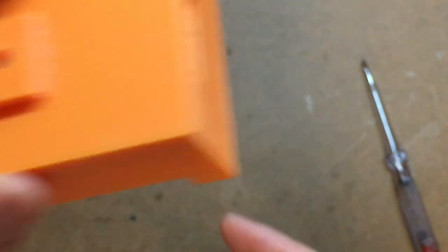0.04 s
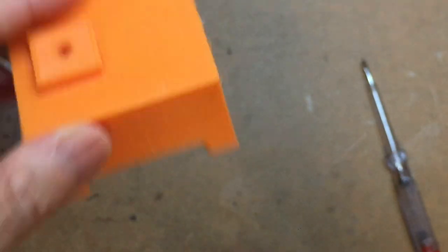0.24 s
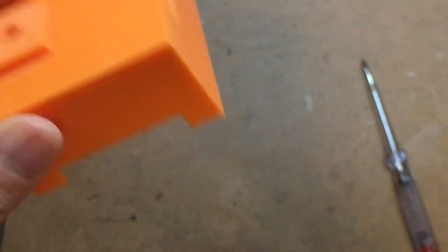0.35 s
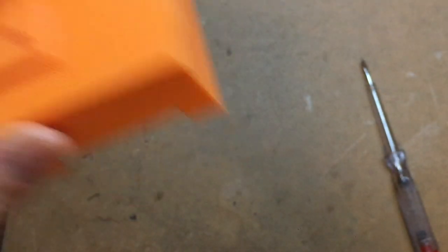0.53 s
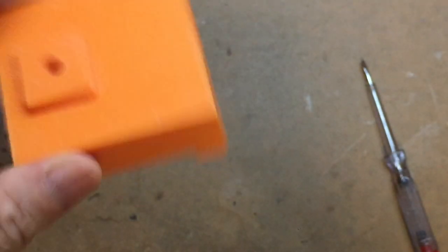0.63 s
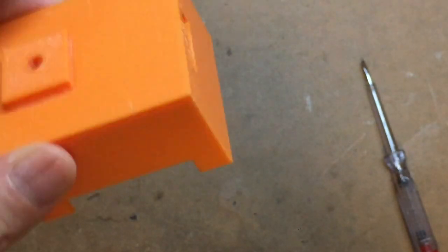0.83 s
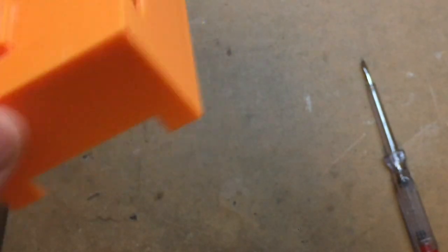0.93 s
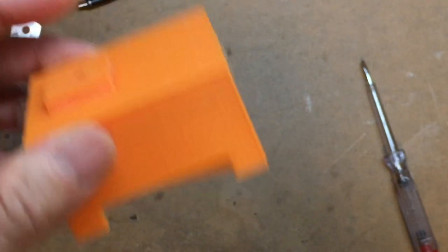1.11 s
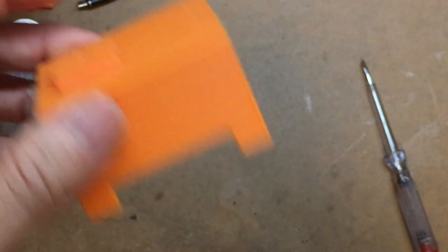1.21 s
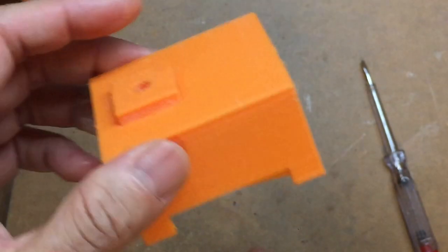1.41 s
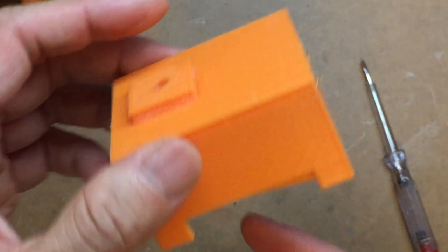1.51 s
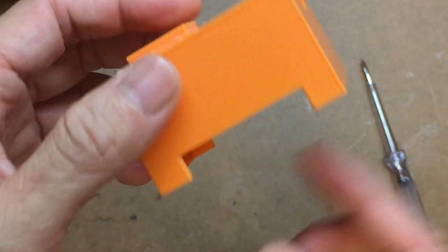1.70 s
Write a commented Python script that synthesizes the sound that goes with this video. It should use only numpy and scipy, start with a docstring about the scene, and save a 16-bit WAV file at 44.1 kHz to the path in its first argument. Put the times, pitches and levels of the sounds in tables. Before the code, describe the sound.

A loose part rattles inside a hollow plastic housing shaken by hand. Sharp clacks alternate with duller, chattering knocks, then the part bounces softly to rest, heard close up in a small room.

```python
"""A small room, over a workbench: a hollow plastic housing is shaken by hand. A loose part inside clacks hard
against one stop, falls back with a duller, chattering knock and bounces to rest. Each blow rings the shell
briefly, and the room answers with a short tail. Underneath sit a faint slide of the fingers, soft bumps of the
grip, a low rumble, hum and hiss."""
import sys
import numpy as np
from scipy import signal
from scipy.fft import rfft, irfft
from scipy.io import wavfile
from scipy.ndimage import uniform_filter1d

SR = 44100
rng = np.random.default_rng(int(sys.argv[2]) if len(sys.argv) > 2 else 0)


def pcm_store(signal):
    """Save signal as 16-bit PCM."""
    levels = np.round(np.clip(np.atleast_2d(signal), -1, 1) * 32767)
    wavfile.write(sys.argv[1], SR, levels.astype(np.int16).T)


N = 77175

# Hard hits on the stop; the rebound's delay and gain are relative to its hit:
# start_s, level_db, weight_db, edge_db_per_octave, pitch_ratio, rebound_delay_s, rebound_gain_db
CLACKS = [(.2068, -23, -3, -1.5, 1.02, 0.0036, -3.5), (.4488, -22.5, 0, -1.5, 1.05, 0.0023, -5),
          (.6032, -17.5, 7, 3, 1.0, .0029, -7), (.7859, -18, 3.5, 1.5, .995, 0.0014, -20.5),
          (.9842, -21, -7.5, -2.5, 0.98, 0.0038, -10)]
# Softer falls and bounces, same columns as CLACKS
KNOCKS = [(.0078, -36.5, 4, 4.5, .98, 0.0027, -4), (.153, -54.5, -4, -5, .95, .002, -17),
          (.249, -36, -25, 0, 1.15, 0.0021, -3.5), (.2750, -21, 1, 3, 0.99, .0064, -1),
          (.302, -37, -1.5, -5, 0.81, 0.003, -3), (.3325, -29, -12.5, -5, .97, .0022, -8.5),
          (.370, -62, 7, 5, 0.72, 0.0036, 12), (.396, -57, -3, -3, 1.1, 0.0056, -7.5),
          (.4937, -22, 2, 3, .98, .004, -3), (.530, -34, -0.5, -1.5, 1.01, .004, 0.5),
          (.562, -31.5, -6.5, -1.5, 0.93, .002, -12), (.6698, -24, 6, 3.5, 0.971, 0.0034, -3.5),
          (.699, -32.5, 2.5, 0.5, 1.09, .003, -2.5), (.747, -40, -2, -0.5, .98, .002, -12.5),
          (.8515, -33.5, 1, 2.5, 0.96, .0021, 8), (.8873, -28, -0.5, 3, 0.95, 0.0018, -27),
          (.916, -45, 0, -5.5, 1.14, 0.0028, -9), (.941, -53, 0, -5, .98, .002, 3),
          (1.016, -41, -19, 1, 1.0, .002, 5.5), (1.0487, -23.5, 1.5, 1, 0.95, 0.006, 0),
          (1.098, -39, -1.5, -0.5, 1.07, 0.0052, -6), (1.131, -42, -4.5, -2, 0.97, .002, -6),
          (1.3075, -36.5, -7.5, -3, 1.034, 0.0037, 1), (1.3465, -40.5, -10.5, -8, 0.97, 0.0027, 5),
          (1.381, -57.5, -5.5, -6, 0.94, 0.0021, -3.5), (1.413, -47.5, -5, -6, .99, 0.0021, -4)]
# Tone of a hard, bright contact: frequency_hz, gain_db
HARD_CONTACT = [(150, -7), (450, -20.5), (800, -4.5), (1600, -2), (2400, 0.5), (3000, 4), (3400, 3.5),
                (4000, 5.5), (8000, 0.5), (15000, -1.5)]
# Tone of a soft, dull contact: frequency_hz, gain_db
SOFT_CONTACT = [(250, -19.5), (550, -20.5), (790, -6), (1100, -4.5), (1450, 1), (1900, 7), (2500, -9),
                (3300, -8), (4200, -17), (5500, -22), (9000, -21), (15000, -20)]
# Clear ringing modes of the shell: pitch_hz, gain_db, t60_s
SHELL_MODES = [(822, -14.5, 0.032), (1050, -13, 0.032), (1451, -2.5, 0.043), (1782, -6, 0.023),
               (1878, -6.5, 0.052), (2056.4, 3.5, .04), (2373, 0.5, 0.053), (2746, -4, 0.04),
               (3944, 6, 0.021), (4280, 5, .023), (4472, 2.5, 0.016), (5100, 1.5, .02), (5440, 4.5, 0.017),
               (6790, 4.5, 0.011), (8110, 0, 0.012), (9220, -7, .012)]
# Tone of the crack, a crowd of heavily damped modes between the clear ones: frequency_hz, gain_db
CRACK_TONE = [(200, -14), (500, -16), (800, -8), (2000, 1), (2900, 4.5), (3400, -9), (4000, 2), (5500, 3.5),
              (6200, 0), (7300, 3), (11000, -4.5), (16000, -11)]
# Length of the room's tail: frequency_hz, t60_s
ROOM_DECAY = [(300, 0.5), (1000, 0.28), (1950, 0.2666), (3000, 0.2435), (5000, 0.31), (9000, .25),
              (15000, 0.27)]
# Colour of the room's tail: frequency_hz, gain_db
ROOM_TONE = [(300, -2), (1000, 1), (1950, 1.5), (2800, 4.5), (3400, 3), (4200, 0), (5500, -0.5), (9000, 0),
             (15000, 1)]
# Bumps of the fingers on the housing: start_s, pitch_hz, level_db
GRIP_BUMPS = [(.272, 246, -58), (0.484, 290, -59.5), (.603, 316, -60.5), (1.214, 300.3, -65),
              (1.53, 408.2, -62.5)]
# Tone of the finger slide: frequency_hz, gain_db
SLIDE_TONE = [(500, -42), (1500, 9), (2300, -4.5), (3100, 0), (4500, -10), (14000, -33)]
# Tone of the rumble and hiss bed: frequency_hz, gain_db
BED_TONE = [(20, -45.5), (32, -26), (48, -6), (65, 1), (85, -4), (102, 0.5), (130, -8), (165, -4),
            (210, -23), (300, -20.5), (480, -29.5), (1000, -28.5), (2000, -37), (4500, -42.5), (14000, -51),
            (16000, -57)]
# Wavering low tones: pitch_hz, level_db
HUM_TONES = [(62, -58.5), (160, -69.5)]
# Contour that the bass partly follows, taken around its mean: time_s, contour_db
BASS_SWELL = [(0.02, -46.5), (0.086, -55), (0.114, -55.5), (0.772, -55.5), (0.814, -65.5), (0.876, -52.5),
              (0.914, -62.5), (1.032, -54.5), (1.274, -55), (1.308, -65.5), (1.33, -51.5), (1.464, -64),
              (1.492, -52.5), (1.652, -50), (1.682, -61.5), (1.72, -52.5)]


def rattle(hits, contact_tone, level_window_s=.005):
    """The loose part strikes the shell, then once more as it rebounds; the room answers both."""
    out = np.zeros(N)
    for start_s, level_db, weight_db, edge_db, pitch_ratio, rebound_s, rebound_db in hits:
        push = contact(contact_tone, weight_db, edge_db)
        blow = np.zeros(SR // 10)
        for delay_s, gain_db in ((0, 0), (rebound_s, rebound_db)):
            hit = signal.fftconvolve(shell(pitch_ratio), push)
            hit *= np.sqrt(level_window_s * SR / np.sum(hit ** 2))  # energy of one window at rms 1
            add(blow, delay_s, amp(level_db + gain_db) * hit)
        add(out, start_s, blow)
        add(out, start_s + .0054, room(blow))  # pre-delay
    return out


def contact(tone, weight_db, edge_db_per_octave, size=1024):
    """The short push of one contact: weight shelves the lows, edge tilts the highs."""
    hz = abs(np.fft.fftfreq(size, 1 / SR))
    low_shelf = 1 / (1 + (hz / 1320) ** 8)
    edge_octaves = np.log2(np.clip(hz, 1200, 6000) / 1200)
    log_gain = np.log(amp(curve(tone, hz) + weight_db * low_shelf + edge_db_per_octave * edge_octaves))
    spectrum = np.exp(np.conj(signal.hilbert(log_gain)))  # minimum phase keeps the attack up front
    return np.fft.ifft(spectrum).real[:size // 2]


def shell(pitch_ratio, strike_spread_db=2.5, grip_detune=.008, size=4096):
    """The housing rings in clear modes over a dense, dry crack; each blow lands a little differently."""
    t = np.arange(size) / SR
    ring = np.zeros(size)
    for k, (hz, gain_db, t60_s) in enumerate(SHELL_MODES):
        strike, grip = rng.standard_normal(2)
        mode = np.sin(2 * np.pi * hz * pitch_ratio * (1 + grip_detune * grip) * t)
        ring += (-1) ** k * amp(gain_db + strike_spread_db * strike) * fade(t, t60_s) * mode
    crowd = noise(CRACK_TONE, size)
    body = lowpass(crowd, cutoff_hz=6000, order=2)
    crack = body * fade(t, t60_s=.036) + (crowd - body) * fade(t, t60_s=.018)
    return unit(ring) + amp(1) * unit(crack)


def room(blow, send_db=-12, build_s=.0028, blur_hz=70, size=20000):
    """A diffuse tail in the colour of the blow: it builds quickly, and each band dies at its own speed."""
    # The room hears every side of the shell at once, which evens out its colour.
    bin_hz = np.fft.rfftfreq(size, 1 / SR)
    blur = np.exp(-((bin_hz[:801] - bin_hz[400]) / (blur_hz / 2)) ** 2)
    power = abs(rfft(blow, size)) ** 2
    colour = np.sqrt(abs(signal.fftconvolve(power, blur / blur.sum(), "same")))
    wash = irfft(rfft(noise(ROOM_TONE, size)) * colour, size)
    hz, t, bands = signal.stft(wash, SR, nperseg=256)
    envelope = fade(t, curve(ROOM_DECAY, hz)[:, None]) * (1 - np.exp(-t / build_s))
    tail = signal.istft(bands * envelope, SR, nperseg=256)[1]
    return amp(send_db) * tail / np.sqrt(size * np.mean(envelope ** 2))


def fingers(rise_s=.0096, size=6000):
    """Faint, round low bumps as the grip shifts."""
    out = np.zeros(N)
    t = np.arange(size) / SR
    envelope = t / rise_s * np.exp(1 - t / rise_s)
    for start_s, hz, level_db in GRIP_BUMPS:
        add(out, start_s, amp(level_db) * envelope * np.sin(2 * np.pi * hz * t))
    return out


def slide(peak_s=.098, half_width_s=.024, level_db=-64.5):
    """The fingers slide on the housing before the first clack: a faint swell of rubbing."""
    swell = np.exp(-((np.arange(N) / SR - peak_s) / half_width_s) ** 2)
    return amp(level_db) * noise(SLIDE_TONE, N) * swell


def background(bed_db=-58, waver_depth_hz=4, waver_rate_hz=8, swell_depth=.7):
    """A bed of faint, steady hiss, with a low rumble and hum that swell and sink together."""
    bed = amp(bed_db) * noise(BED_TONE, N)
    bass = lowpass(bed, cutoff_hz=350, order=4)
    hiss = bed - bass
    for hz, level_db in HUM_TONES:
        waver = noise([(waver_rate_hz, 0), (2 * waver_rate_hz, -100)], N)
        cycles = np.cumsum(hz + waver_depth_hz * waver) / SR + rng.random()
        bass += amp(level_db) * np.sqrt(2) * np.sin(2 * np.pi * cycles)
    contour_db = np.interp(np.arange(N) / SR, *np.transpose(BASS_SWELL))
    swell_db = uniform_filter1d(contour_db, size=1500)
    return hiss + bass * amp(swell_depth * (swell_db - swell_db.mean()))


def amp(db):
    """Decibels to gain."""
    return 10 ** (np.asarray(db) / 20)


def unit(x):
    """Scales to rms 1."""
    return x / np.sqrt(np.mean(x ** 2) + 1e-20)


def fade(t, t60_s):
    """A decay of 60 dB in t60_s seconds."""
    return np.exp(-np.log(1000) * t / t60_s)


def curve(points, hz):
    """Reads a table on a log-frequency axis."""
    point_hz, values = np.transpose(points)
    return np.interp(np.log(hz + 1), np.log(point_hz + 1), values)


def noise(tone, size):
    """Noise shaped by an EQ curve, at rms 1."""
    gain = amp(curve(tone, np.fft.rfftfreq(size, 1 / SR)))
    return unit(irfft(rfft(rng.standard_normal(size)) * gain, size))


def lowpass(x, cutoff_hz, order):
    """Rolls off the top, forwards and backwards so the phase stays put."""
    return signal.sosfiltfilt(signal.butter(order, cutoff_hz, fs=SR, output="sos"), x)


def add(mix, start_s, sound):
    """Drops a sound into the mix at start_s."""
    part = mix[max(round(start_s * SR), 0):][:len(sound)]
    part += sound[:len(part)]


def scene():
    """The rattling housing over its quiet layers, in mono."""
    quiet_layers = background() + slide() + fingers()
    return (quiet_layers + rattle(CLACKS, HARD_CONTACT) + rattle(KNOCKS, SOFT_CONTACT))[None]


def record(dry):
    """A steep high cut at 16150 Hz trims the very top."""
    high_cut = signal.firwin(255, 16150, window=("kaiser", 9), fs=SR)
    return signal.oaconvolve(dry, high_cut[None], "same")


dry = scene()
out = record(dry)
pcm_store(out)
```